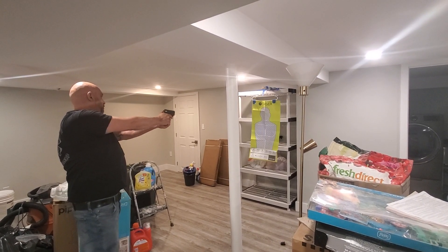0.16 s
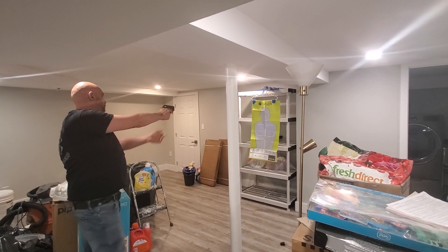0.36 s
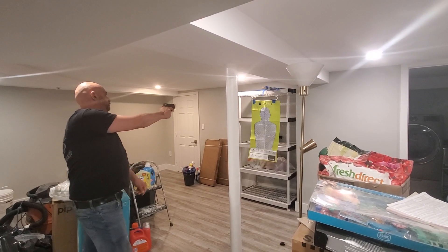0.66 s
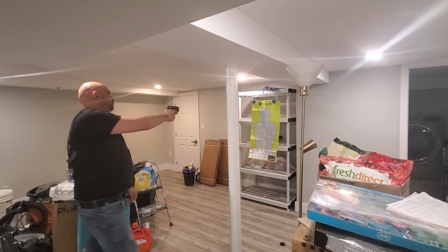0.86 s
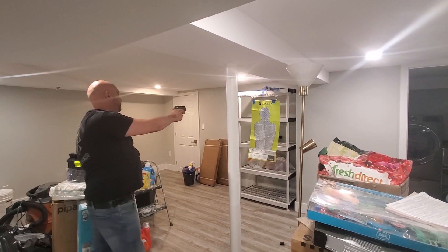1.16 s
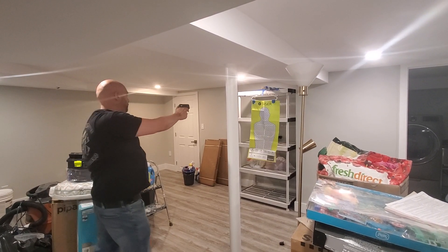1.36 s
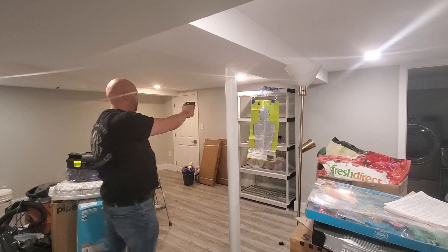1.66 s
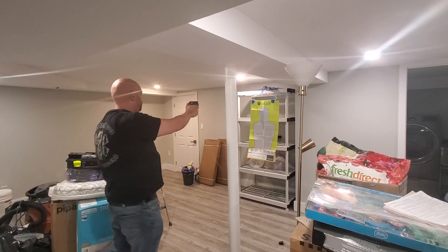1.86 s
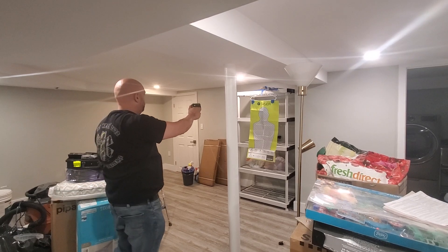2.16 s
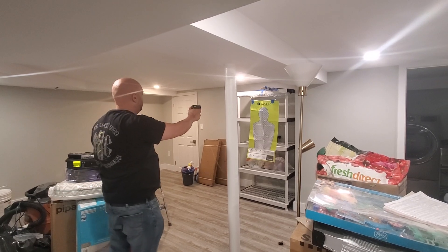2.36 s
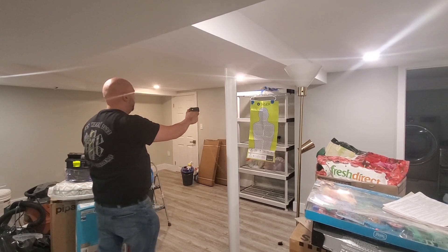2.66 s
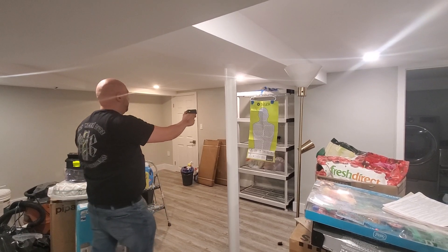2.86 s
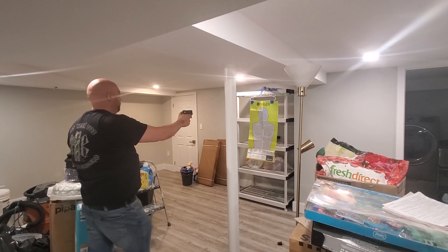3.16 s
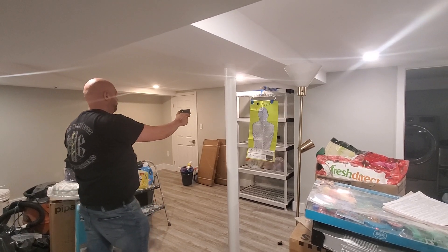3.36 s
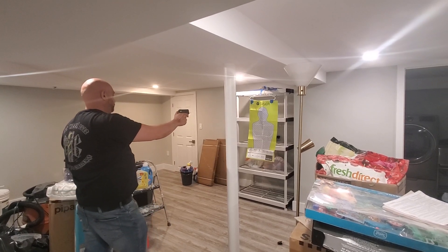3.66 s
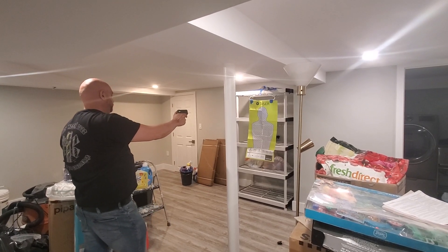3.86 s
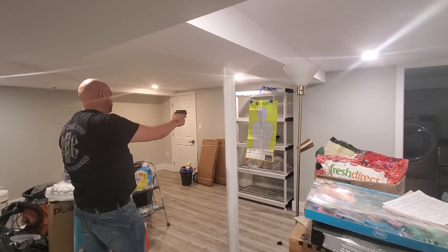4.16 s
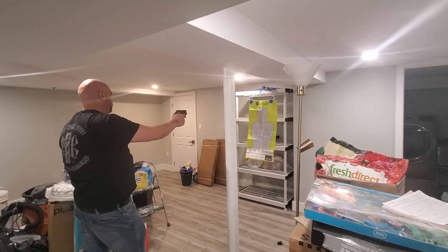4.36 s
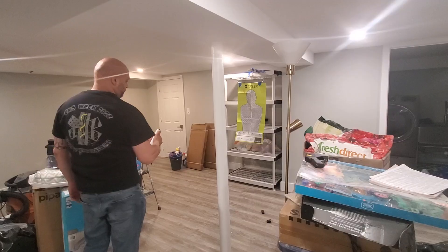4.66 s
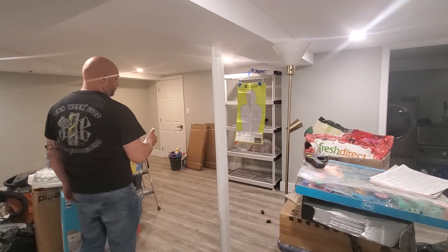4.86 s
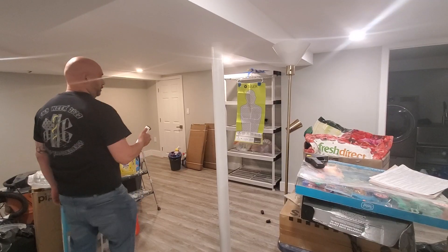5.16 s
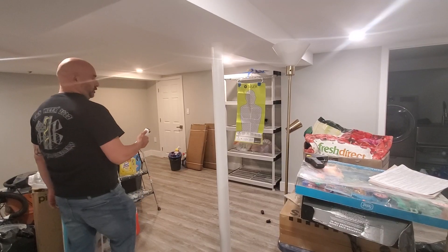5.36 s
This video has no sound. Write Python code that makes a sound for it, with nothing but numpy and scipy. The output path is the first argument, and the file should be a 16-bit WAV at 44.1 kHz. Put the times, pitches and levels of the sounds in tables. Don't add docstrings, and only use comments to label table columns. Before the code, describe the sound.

A stun device is already arcing as the sound begins, giving a dense, harsh crackle of about nineteen sharp electric snaps per second. Around 1.3 seconds the rate drops to about twelve per second, and each crack becomes more separate, continuing evenly and loudly. The snaps are bright and thin, smeared by quick echoes from the floor, ceiling and walls of a low basement, heard by a phone a few metres behind. Underneath, nearly masked, are dull steps near 1.1 and 3.5 seconds and a low handling thud at 3.3. At about 4.4 seconds the crackle stops dead, its short echo fading into reduced low house hum and faint hiss. Soft bumps on the phone follow from 4.7, with firmer ones around 4.9 to 5.0, alongside a small plastic click and a louder latch click. Another light touch comes at 5.4, and a tiny, bright, hard tick at 5.5.

```python
import sys
import numpy as np
from scipy import signal
from scipy.fft import rfft, irfft
from scipy.io import wavfile
from scipy.ndimage import uniform_filter1d

SR = 44100
rng = np.random.default_rng(int(sys.argv[2]) if len(sys.argv) > 2 else 0)


def to_wav(s):
    ch = np.atleast_2d(s).T
    pcm = np.round(np.clip(ch, -1, 1) * 32767)
    wavfile.write(sys.argv[1], SR, pcm.astype(np.int16))


def level_to_linear(level):
    exponent = np.asarray(level, float) / 20
    return 10 ** exponent


N = 243431


def read(table, hz, column=1):
    table = np.array(table, float)
    return np.interp(np.log(hz + 1), np.log(table[:, 0] + 1), table[:, column])


def set_level(x, db):
    return x * level_to_linear(db) / np.sqrt(np.mean(x ** 2))


def colour(x, gain_db):
    size = 4096
    cepstrum = irfft(gain_db(np.fft.rfftfreq(size, 1 / SR)) * np.log(10) / 20)
    cepstrum[..., 1:size // 2] *= 2
    cepstrum[..., size // 2 + 1:] = 0
    response = np.atleast_2d(irfft(np.exp(rfft(cepstrum))))
    return signal.fftconvolve(x, response, axes=-1)[..., :x.shape[-1]]


def highpass(x, order, hz):
    return signal.sosfilt(signal.butter(order, hz, "high", fs=SR, output="sos"), x)


def fade(start_s, length_s):
    progress = np.clip((np.arange(N) / SR - start_s) / length_s, 0, 1)
    return .5 - .5 * np.cos(np.pi * progress)


def walk(rate):
    k = int(SR / rate)
    held = np.repeat(rng.standard_normal(N // k + 1), k)
    return 1.2 * uniform_filter1d(uniform_filter1d(held, k), k)[:N]


# (frequency [Hz], width [Hz], boost [dB])
STANDING_WAVES = [(154.4, 6.7, 13), (178.4, 22, 12), (235.3, 27, 10), (328.5, 44, 8.5), (355, 26, 3),
                  (403.5, 66, 4), (523, 63, 3.5), (620, 25, 5.5), (755, 21, 7), (827, 23, 5),
                  (1142, 41, 4.5), (1355, 140, 3), (1830, 130, 3), (2240, 130, 3)]


def standing(hz):
    return sum(db / (1 + (2 * (hz - f) / width) ** 2) for f, width, db in STANDING_WAVES)


# (frequency [Hz], likeness [0-1])
PORT_LIKENESS = [(60, 0.93), (150, 0.93), (300, 0.96), (650, 0.13), (1200, 0)]


def pair(spectra, hz):
    like = np.clip(read(PORT_LIKENESS, hz), 0, 1)
    mid = np.sqrt(1 + like) * spectra[0]
    side = np.sqrt(1 - like) * spectra[1]
    return np.array([mid + side, mid - side]) / 2


# (frequency [Hz], width [Hz], gain [dB])
PORT_NOTCH = [(7820, 290, -10), (9440, 2400, -5.5)]


def ports(hz, balance):
    notch = [db / (1 + (2 * (hz - f) / width) ** 2) for f, width, db in PORT_NOTCH]
    return np.array(notch) + np.outer([.5, -.5], read(balance, hz))


# (frequency [Hz], level per Hz [dB])
HOUSE_COLOUR = [(22, -40.5), (36, -18.5), (53, -4.5), (110, -14), (200, -16), (300, -22), (450, -21),
                (600, -29.5), (1000, -33.5), (1300, -25), (2400, -25.5), (3000, -35.5), (8000, -45.5),
                (15000, -43.5)]
# (frequency [Hz], left minus right [dB])
HOUSE_BALANCE = [(60, -2), (110, 3), (200, 1.5), (380, -4), (700, 1), (1290, 12), (2380, 8.5), (4400, 7),
                 (8120, -6), (15000, 4)]
# (frequency [Hz], level [dB])
HUM = [(759.0, -79), (1362, -76), (2051, -71.5), (2196, -75.5), (2417, -77)]
# (frequency [Hz], level per Hz [dB])
FAINT_COLOUR = [(600, 1), (1000, 0), (2400, -3), (3000, -10), (5500, -8), (8500, -11.5), (12000, -13),
                (15000, -9)]


def house():
    hz, t = np.fft.rfftfreq(N, 1 / SR), np.arange(N) / SR
    noise = pair(rfft(rng.standard_normal((2, N))), hz)
    air = noise * level_to_linear(read(HOUSE_COLOUR, hz) + standing(hz) + ports(hz, HOUSE_BALANCE))
    low, high = 1 / (1 + (hz / 120) ** 6), 1 / (1 + (550 / (hz + 1)) ** 6)

    shut = fade(4.45, .12) + 0.52 * (1 - fade(0, .45))
    back = fade(5.05, .3)

    deep = set_level(irfft(air * low, N), -62.5)
    deep = deep * level_to_linear(-2 * shut + 1.5 * walk(19) + .4 * walk(3.6))
    drone = set_level(irfft(air * (1 - low - high), N), -59.5)
    drone = drone * level_to_linear(-7.5 * shut + 3.5 * back + 2.2 * walk(4.5))
    hiss = set_level(irfft(air * high, N), -66.5) * level_to_linear(1.3 * walk(9))

    tones = np.zeros((2, N))
    port_phase = np.array([[0], [.3]])
    for f, db in HUM:
        loudness = level_to_linear(db + 2.6 * walk(18.0))
        tones += loudness * np.sin(2 * np.pi * (f * t + 0.29 * walk(13) + port_phase))

    faint = rfft(rng.standard_normal((2, N))) * high
    faint = irfft(faint * level_to_linear(read(FAINT_COLOUR, hz) + ports(hz, HOUSE_BALANCE)), N)
    faint = set_level(faint, -73) * (0.35 + 0.67 * back) * level_to_linear(1.2 * walk(8))
    return deep + drone + level_to_linear(14 * (1 - shut) - 4.5) * (hiss + tones) + faint


def timer():
    first_s, fast_s, slow_s = .0226, .051876, .082857
    fast_count, slow_count = 26, 37
    fast = first_s + fast_s * np.arange(-2, fast_count)
    s = np.r_[fast, fast[-1] + slow_s * np.arange(1, slow_count + 1)]
    jitter, scatter, heat = rng.standard_normal((len(s), 3)).T.clip(-2, 2)
    db = -1.5 * np.exp(-s.clip(0) / 0.25) + 0.26 * s + .4 * scatter
    return s + .3 / 1000 * jitter, db - np.mean(db), 1.2 * heat


# (left level [dB], right level [dB], loss below the
# top octave [dB])
DIRECT = [(9.5, 2.5, -13), (3, -1, -11), (4.5, -2, -3), (1.5, 0, -4)]
# (left [dB], right [dB], loss [dB])
ECHOES = [(-9, -3.5, 0), (-4, -9, -2.5), (-9.5, -1.5, -1), (-11, -3.5, -1.5), (-19.5, -1, -2),
          (-13, -6, -4), (-7.5, -9, 0.5), (-3, -5, -3), (-7, -2, -6), (-4, -7.5, -20), (-6, -7.5, -1.5),
          (-12, -10, 0), (-13, -8, 0), (-11, -11, -2.5)]
ECHO_MS = [-1, 0, 2.9, 3.6, 5.7, 7.2, 9.2, 10, 11.4, 13.6, 15.6, 17, 20.3, 23.2, 28.5, 33, 41, 70.5]
# (frequency [Hz], gain [dB])
PATH_COLOUR = [(500, -11), (3000, -7), (8000, -5.5), (15000, -4.5)]


def arrivals(s, db, scatter_db=1.5, wander_ms=.06, smear_ms=0.33, smear_db=-6, top_hz=9800):
    whole, shaded = np.zeros((2, 2, N + SR))
    *gain_db, shade_db = np.transpose(DIRECT + ECHOES)
    chance = rng.standard_normal((len(s), 3, len(ECHO_MS))).clip(-2, 2)
    at_s = s[:, None] + (np.array(ECHO_MS) + wander_ms * chance[:, 2]) / 1000
    at = (at_s * SR).astype(int).clip(0)
    for side in range(2):
        gain = level_to_linear(db[:, None] + gain_db[side] + scatter_db * chance[:, side])
        np.add.at(whole[side], at, gain * level_to_linear(shade_db))
        np.add.at(shaded[side], at, gain * (1 - level_to_linear(shade_db)))
    out = whole + highpass(shaded, 4, top_hz)
    clutter_fade = np.exp(-np.arange(128) * 1000 / (smear_ms * SR))
    clutter = level_to_linear(smear_db) * rng.standard_normal((2, 128)) * clutter_fade
    clutter[:, 0] = 1
    out = signal.fftconvolve(out, clutter, axes=1)
    return colour(out[:, :N], lambda hz: read(PATH_COLOUR, hz))


# (frequency [Hz], time to fall 60 dB [s], build-up [ms])
ROOM = [(200, 1, 5.7), (508, 0.52, 8), (1200, 0.4, 2.7), (2500, 0.46, 2.4), (5100, 0.47, 10),
        (8700, 0.39, 3.7), (14200, 0.3, 1.2)]
# (frequency [Hz], likeness [0-1])
REPEAT = [(300, .95), (900, .92), (1800, .85), (4000, .72), (8000, .6), (14000, .56)]


def diffuse(count, size=19200, grain_db=4.5, mixing_s=0.039, gap_ms=2.2):
    t, hz = np.arange(size) / SR, np.fft.rfftfreq(size, 1 / SR)
    like = read(REPEAT, hz)
    drift = 1 - (1 - like) / 3
    centres = np.log([row[0] for row in ROOM])
    shares = [np.interp(np.log(hz + 1), centres, one) for one in np.eye(len(ROOM))]
    shapes = [(1 - np.exp(-t * 1000 / rise_ms)) * level_to_linear(-60 * t / t60) for _, t60, rise_ms in ROOM]
    shapes = [shape / np.sqrt(np.sum(shape ** 2)) for shape in shapes]
    opening = np.clip(t * 1000 / gap_ms, 0, 1) ** 2
    kept = None
    for _ in range(count):
        lumps = rng.exponential(size=(2, size)).clip(0, 4) - 2.5
        grains = level_to_linear(grain_db * np.exp(-t / mixing_s) * lumps)
        fresh = pair(rfft(rng.standard_normal((2, size)) * grains), hz)
        kept = fresh if kept is None else kept
        field = like * kept + np.sqrt(1 - like ** 2) * fresh
        kept = drift * kept + np.sqrt(1 - drift ** 2) * fresh[::-1]
        yield opening * sum(shape * irfft(share * field) for share, shape in zip(shares, shapes))


# (frequency [Hz], level per Hz [dB])
SPARK_COLOUR = [(60, -46), (200, -27), (450, -13.5), (700, -12.5), (1000, -9.5), (1860, -3.5), (3800, 0.5),
                (4800, -1.5), (6300, 0), (8000, -3.5), (10000, -1), (12500, 2), (15700, 4), (18000, 0.5)]
# (frequency [Hz], left minus right [dB])
SPARK_BALANCE = [(60, 10), (110, 6), (200, -1.5), (380, -1.5), (700, 3), (1290, 0.5), (2380, 0.0),
                 (4400, -1.5), (8120, -6), (15000, -1)]


def sparks():
    s, db, heat_db = timer()
    lead = SR // 4
    tails = np.zeros((2, N + 2 * SR))
    starts = (s * SR).astype(int) + lead
    for start, gain, tail in zip(starts, level_to_linear(db), diffuse(count=len(s))):
        tails[:, start:start + tail.shape[1]] += gain * tail
    cracks = tails[:, lead:lead + N] + level_to_linear(-17.0) * arrivals(s[2:], db[2:])
    cracks = colour(cracks, lambda hz: read(SPARK_COLOUR, hz) + standing(hz) + ports(hz, SPARK_BALANCE))
    top = highpass(cracks, 2, 10000)
    extra = level_to_linear(np.interp(np.arange(N) / SR, s, heat_db)) - 1
    return set_level(cracks + extra * top, -27.5)


def ring(s, left_db, right_db, hz, t60, rise_s, lag_s):
    out = np.zeros((2, N))
    span = slice(int(s * SR), min(int((s + lag_s + 2 * t60) * SR), N))
    t = np.clip(np.arange(N)[span] / SR - s - np.array([[lag_s], [0]]), 0, None)
    shape = (1 - np.exp(-t / rise_s)) * level_to_linear(-60 * t / t60)
    out[:, span] = level_to_linear(np.array([[left_db], [right_db]])) * np.sin(2 * np.pi * hz * t) * shape
    return out


# (time [s], level [dB], pitch [Hz], time to fall 60 dB [s])
STEPS = [
    (1.07, -50, 392, 0.16),
    (1.09, -48.5, 215, 0.13),
    (1.302, -51, 372, 0.34),
    (3.38, -56, 333, 0.28),
    (3.46, -49.5, 392, 0.14),
    (3.62, -53, 402, 0.31),
]


def steps():
    return sum(3 * ring(s, db, db, hz, t60, rise_s=0.022, lag_s=.0002) for s, db, hz, t60 in STEPS)


# (time [s], left level [dB], right level [dB], pitch [Hz], time to fall 60 dB [s])
THUD = (3.3105, -39, -26, 65, .105)
# (time [s], left level [dB], right level [dB], pitch [Hz], time to fall 60 dB [s])
BUMPS = [
    (4.706, -61, -54, 60, 0.14),
    (4.932, -44, -50, 61, 0.08),
    (5.046, -53, -42, 59.3, 0.08),
    (5.074, -62, -55, 55, 0.084),
    (5.411, -58, -53, 55, 0.12),
]


def bumps():
    thud = 3 * ring(*THUD, rise_s=0.022, lag_s=0.0022)
    return thud + sum(3 * ring(*bump, rise_s=0.0074, lag_s=0.002) for bump in BUMPS)


# (time [s], left level [dB], right level [dB], pitch [Hz], time to fall 60 dB [s], snap level [dB])
CLICKS = [
    (4.932, -46, -50, 1920, 0.0044, -10),
    (4.9664, -39, -26, 2250, 0.0037, -7),
]


def clicks():
    snap = [(900, 10.5, 0.0016), (3130, 15, 0.002), (5250, -14, 0.0016),
            (10800, -13, .0025), (14500, -22, .002)]
    out = np.zeros((2, N))
    for s, left_db, right_db, hz, t60, snap_db in CLICKS:
        out += 1.5 * ring(s, left_db, right_db, hz, t60, 0.00021, .0001)
        for snap_hz, db, snap_t60 in snap:
            gain_db = snap_db + db
            out += ring(s, left_db + gain_db, right_db + gain_db, snap_hz, snap_t60, 0.00038, .0001)
    return out


def tick():
    modes = [(15200, 2.0, .003), (13600, -1, .0025), (11900, 1, .0025),
             (10300, -1, .0025), (7000, -8, .002)]
    out = np.zeros((2, N))
    for late_s, bounce_db in [(.0001, 4), (.0022, -4)]:
        for hz, db, t60 in modes:
            tap_db = -52 + db + bounce_db
            out += ring(5.5092 + late_s, tap_db, tap_db, hz, t60, .0001, 0)
    return out


def scene():
    return house() + sparks() + steps() + bumps() + clicks() + tick()


def band_limit(x):
    return signal.sosfilt(signal.butter(12, 16980, fs=SR, output="sos"), x)


def record(dry):
    rounded = .3 * np.tanh(dry / .3)
    mix = signal.sosfilt(signal.ellip(12, .2, 90, 15780, fs=SR, output="sos"), rounded)
    return band_limit(mix)


dry = scene()
out = record(dry)
to_wav(out)
```